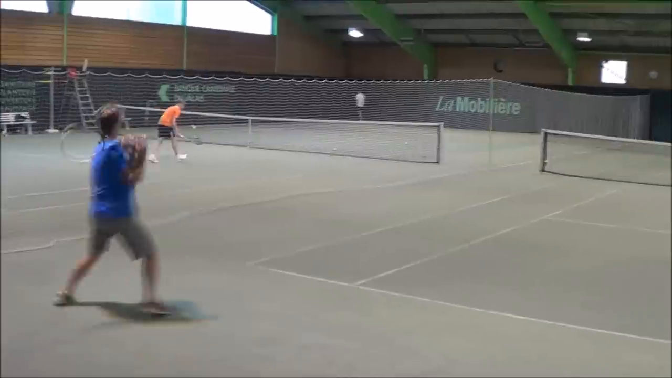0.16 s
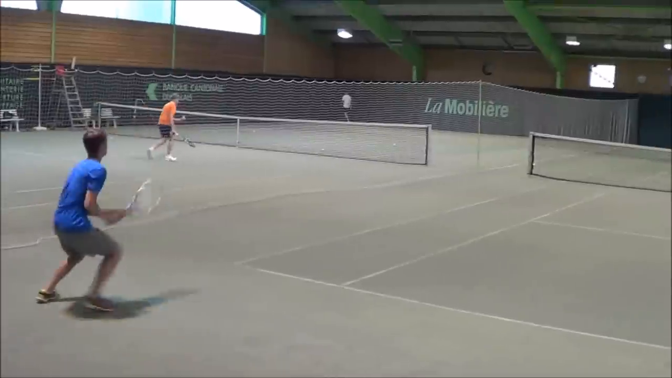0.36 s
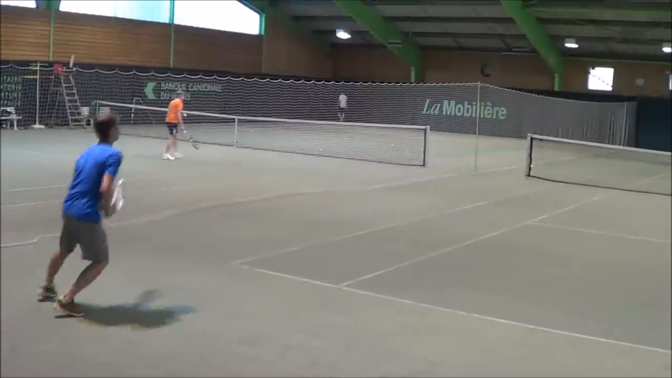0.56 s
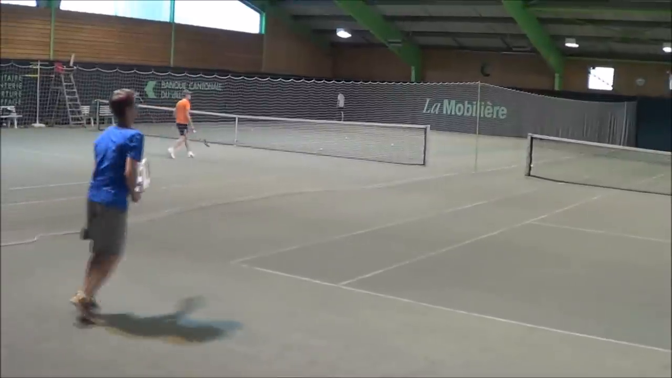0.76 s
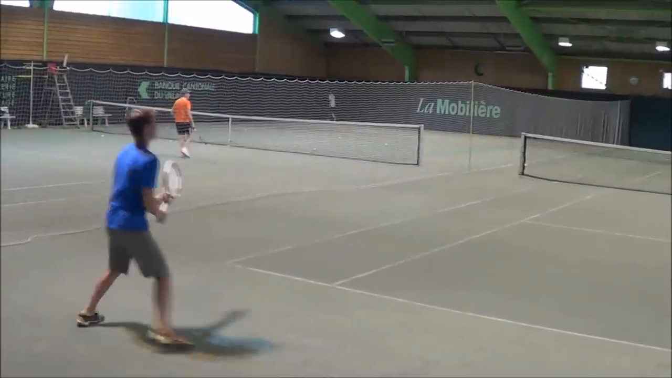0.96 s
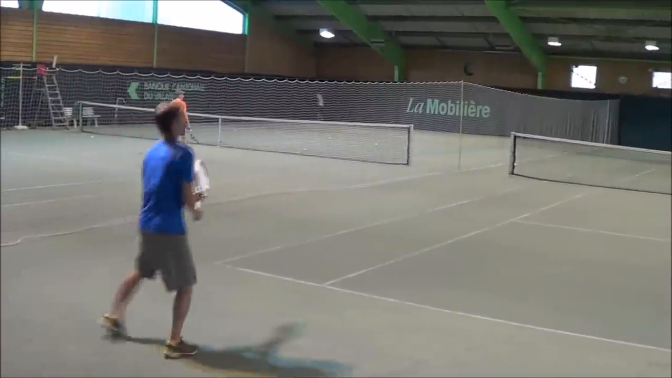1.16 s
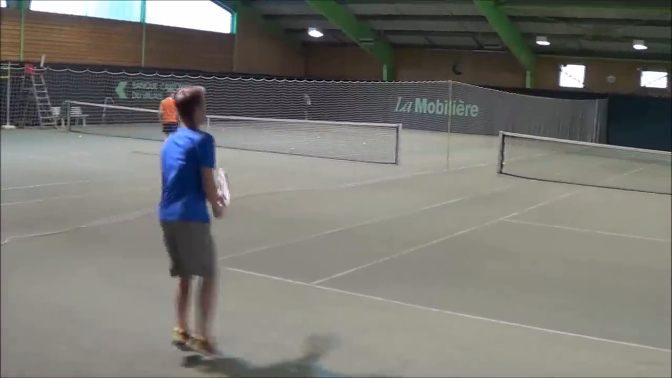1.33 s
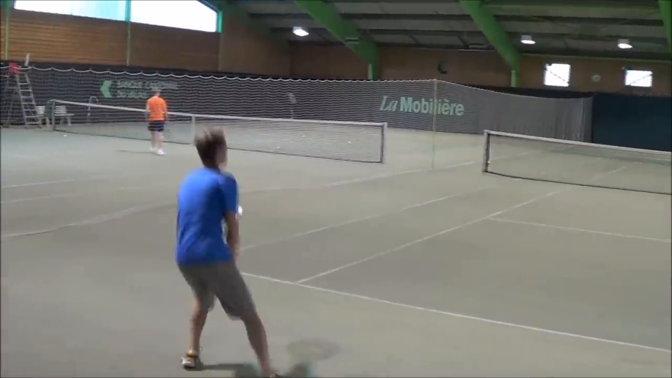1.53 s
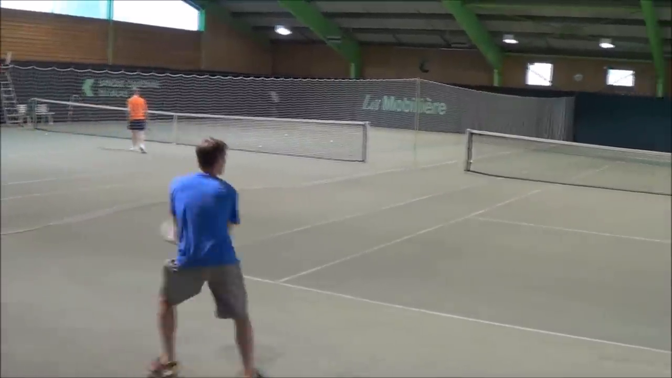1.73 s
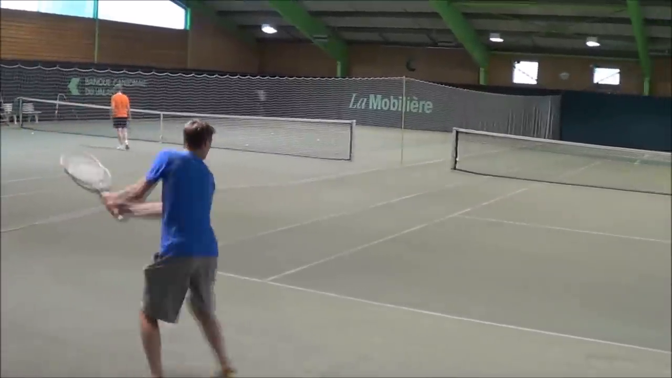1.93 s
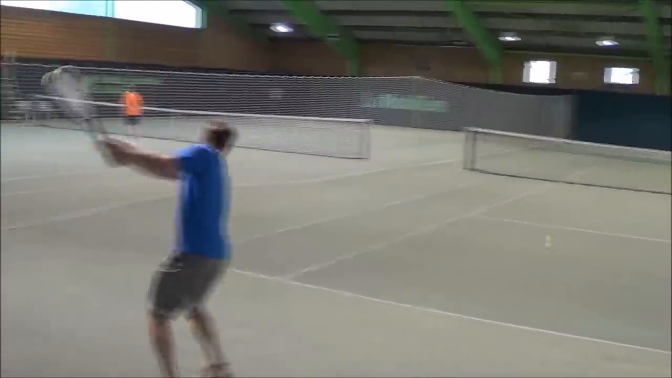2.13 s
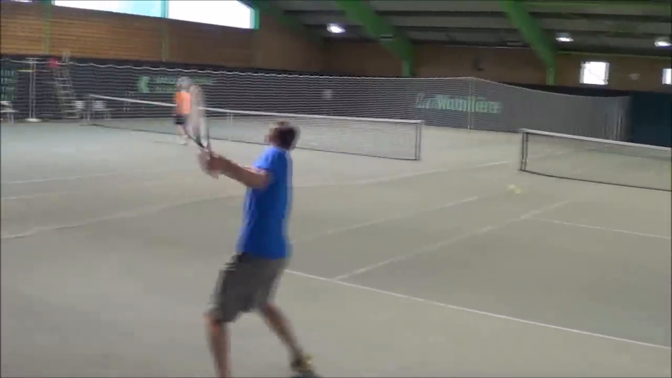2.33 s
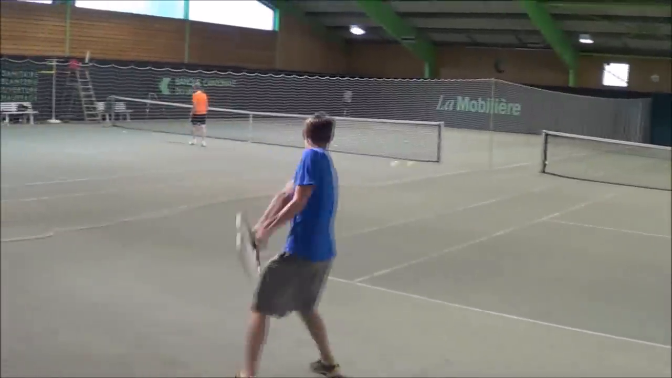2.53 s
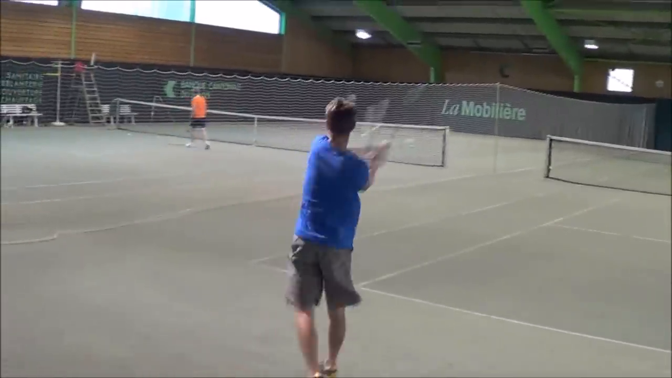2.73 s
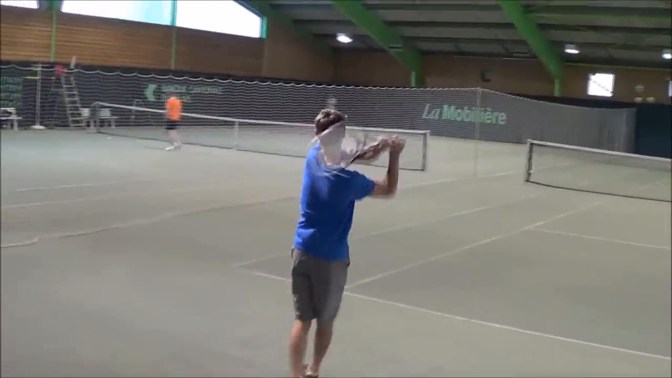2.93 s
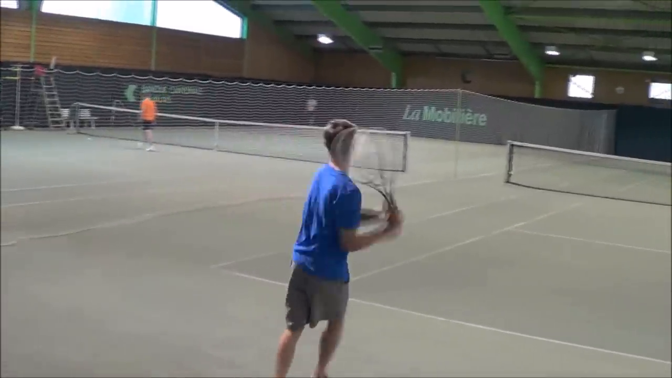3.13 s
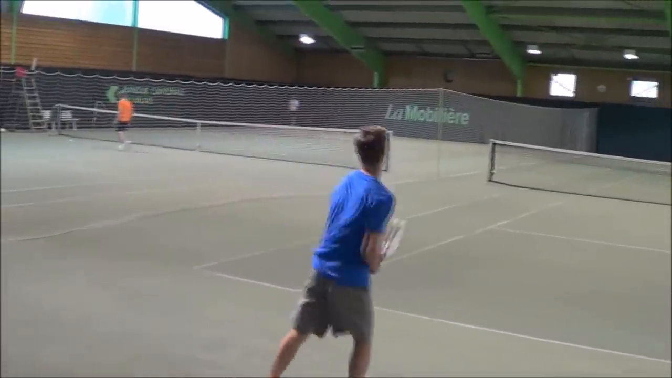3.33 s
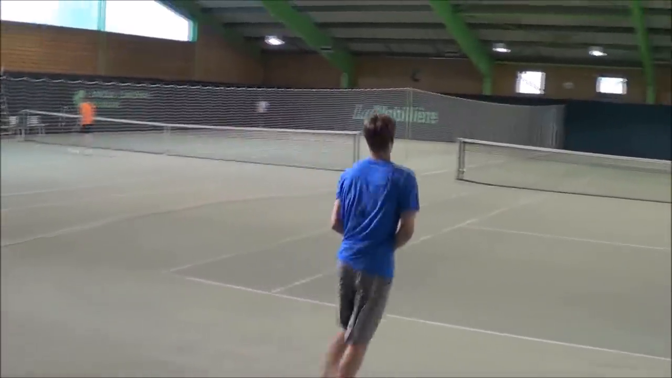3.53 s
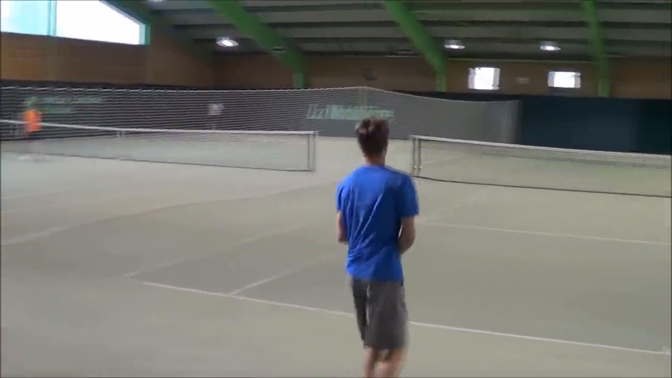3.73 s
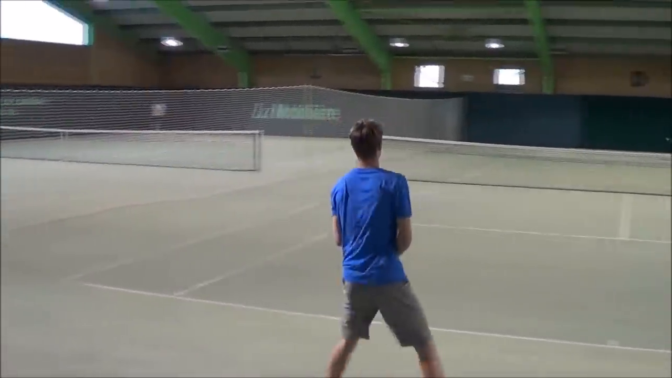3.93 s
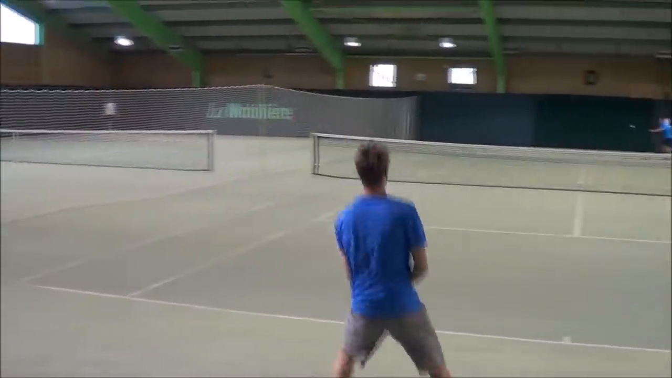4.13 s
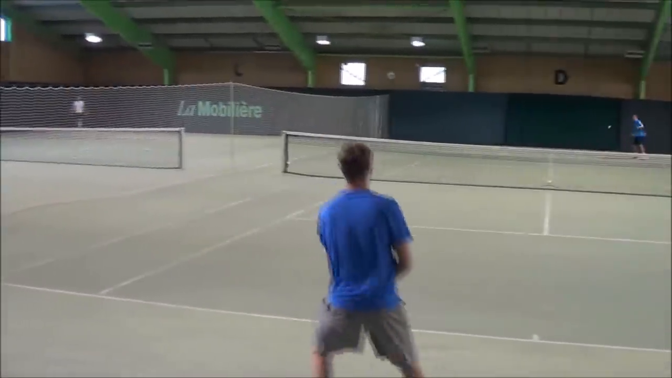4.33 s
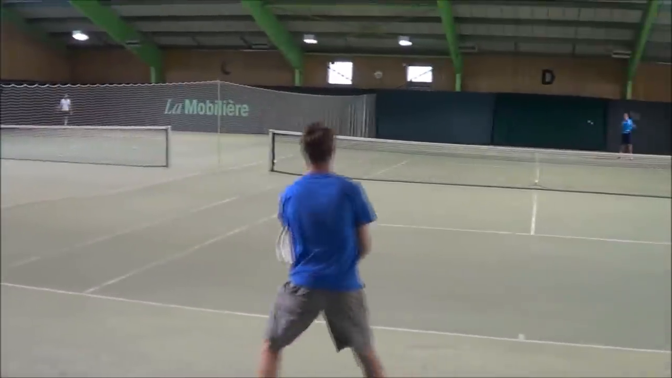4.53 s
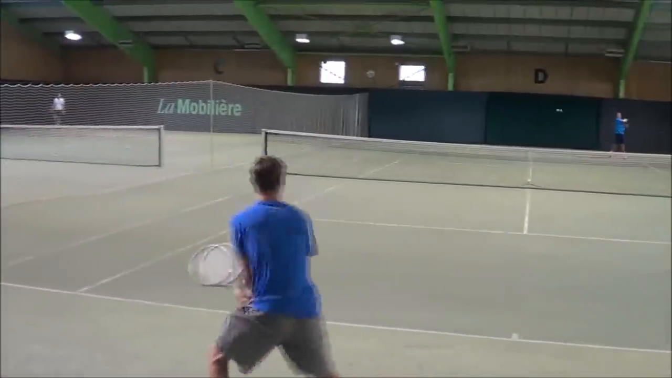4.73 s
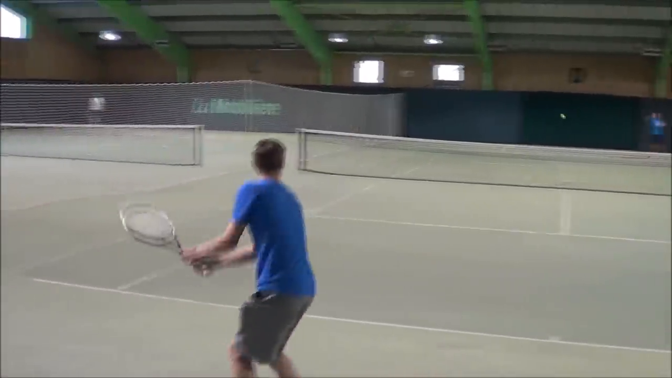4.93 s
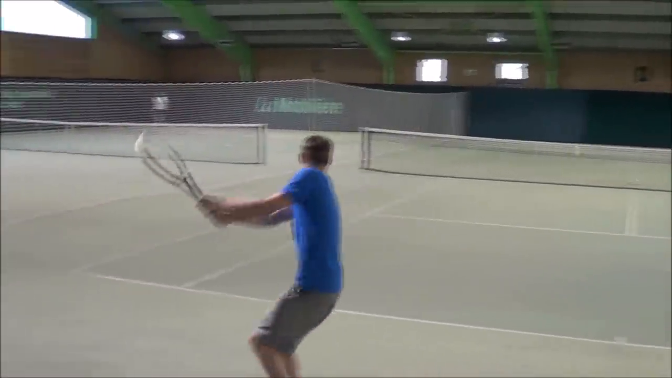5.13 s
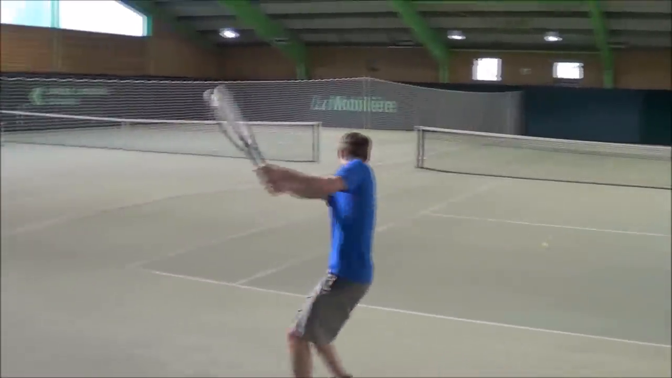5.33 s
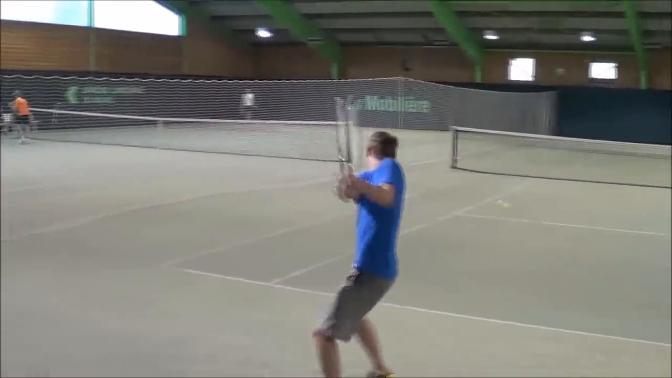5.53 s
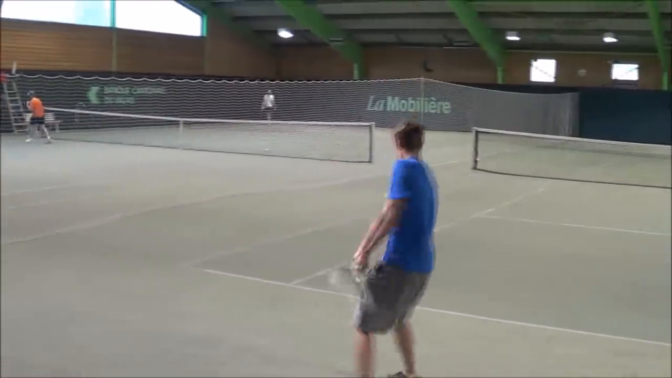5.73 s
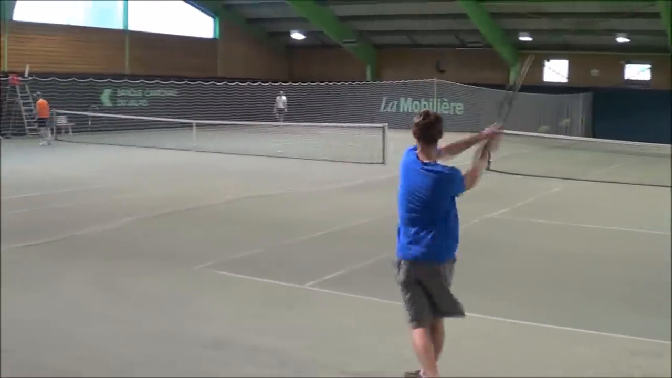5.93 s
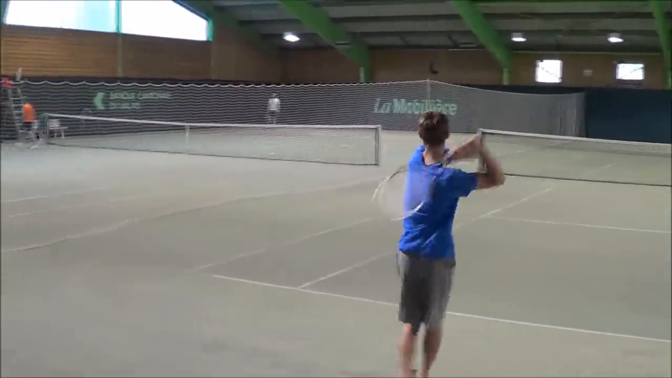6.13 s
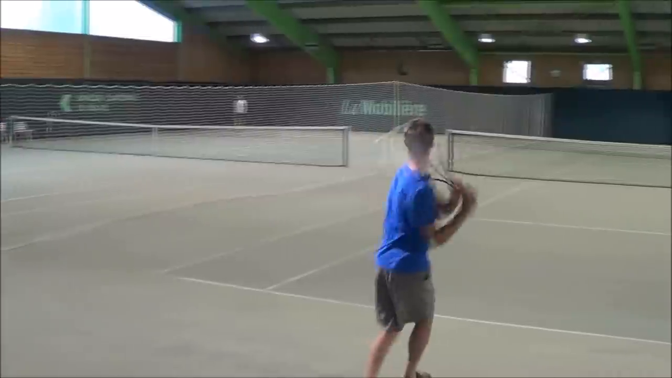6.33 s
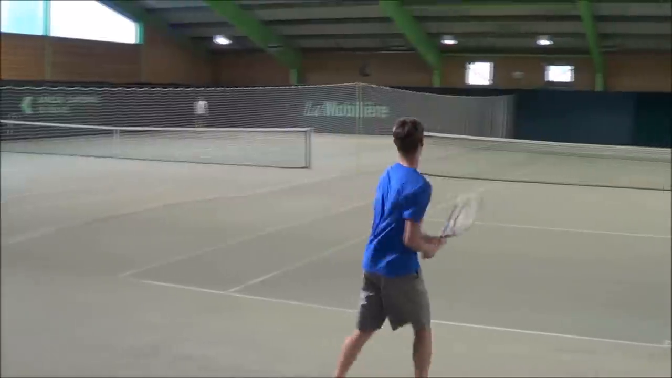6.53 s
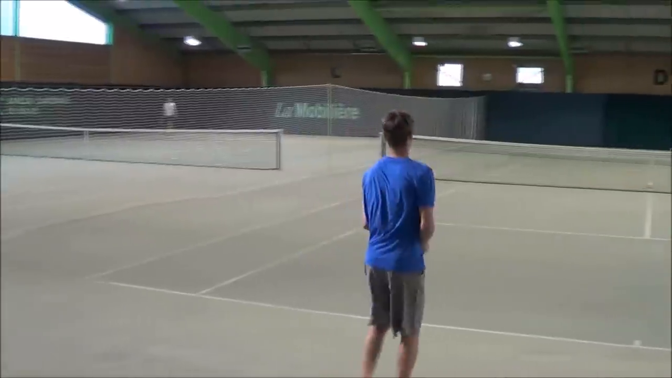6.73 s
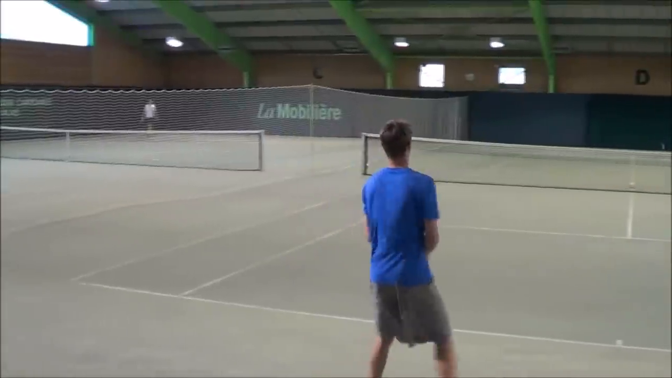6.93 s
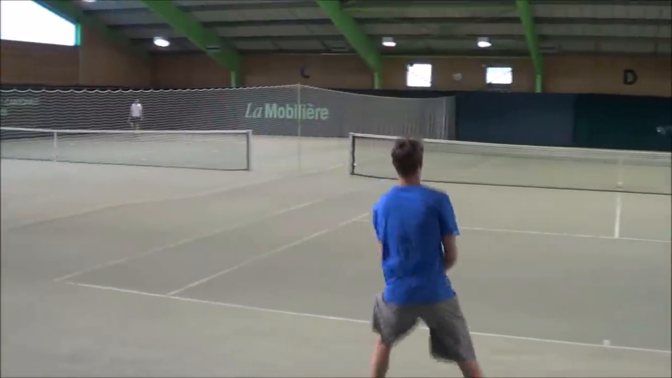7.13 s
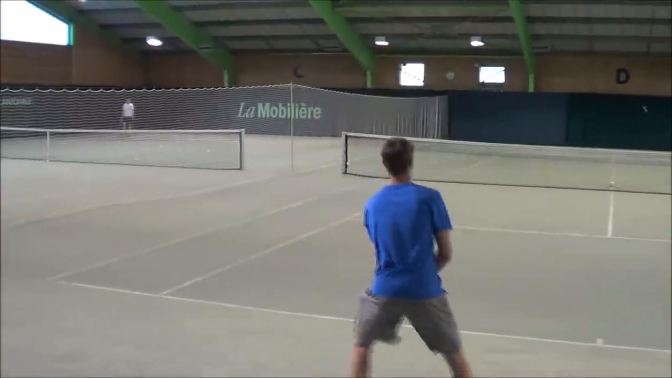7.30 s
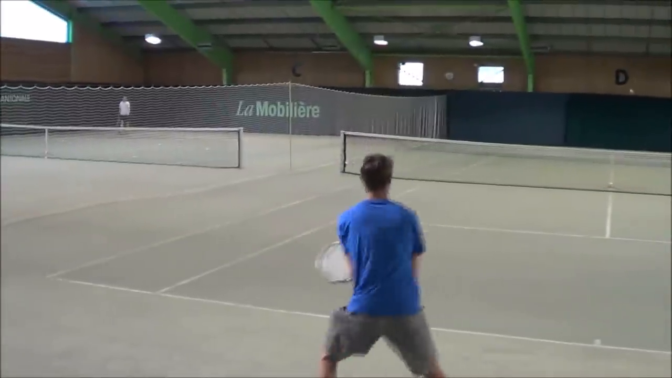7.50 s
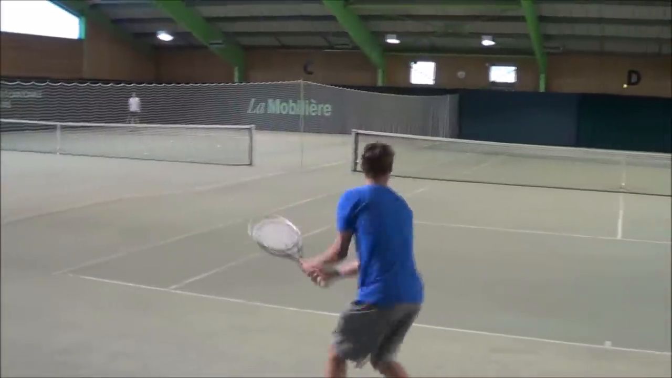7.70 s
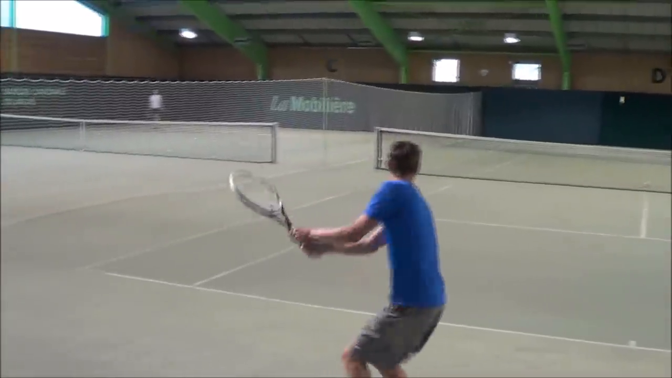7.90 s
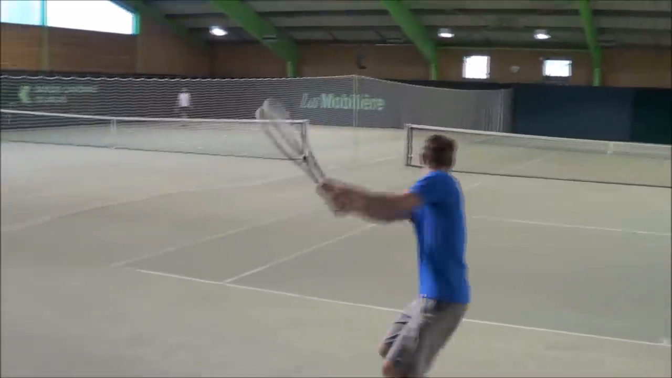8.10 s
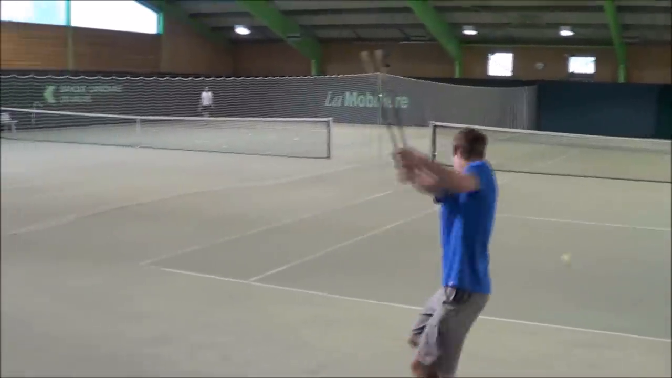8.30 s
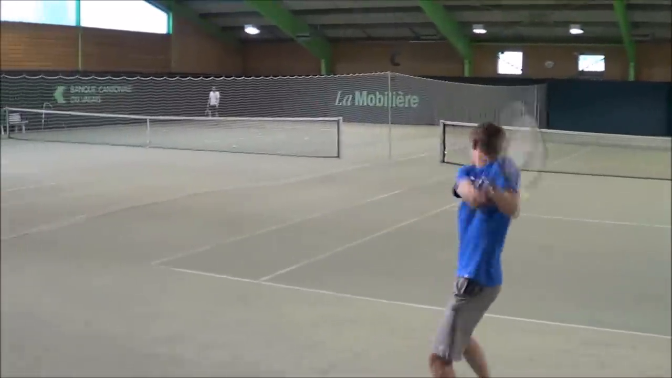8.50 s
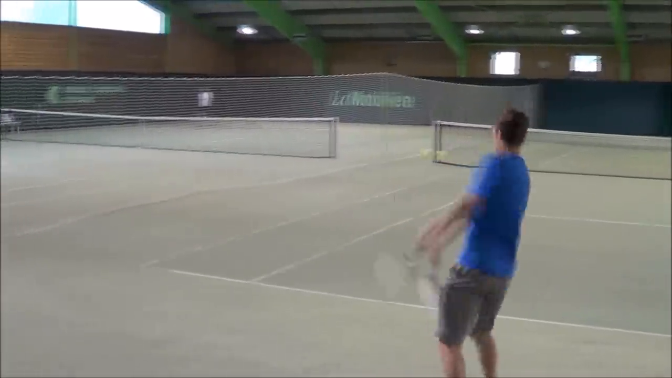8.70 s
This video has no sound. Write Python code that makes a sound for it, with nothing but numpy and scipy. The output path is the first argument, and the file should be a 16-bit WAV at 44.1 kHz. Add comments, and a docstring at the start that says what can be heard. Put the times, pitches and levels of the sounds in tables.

```python
"""A tennis rally in a large indoor hall, heard from a camcorder behind the near baseline.
Throughout, filtered noise makes the ventilation rumble and hiss, and a gated sine the camcorder's whine.
At the start a near stroke is already ringing; rolling noise grains scuff and drag soles over the gritty
court, and resonant pulses thump as footfalls. From about one second the ball bounces between strokes from
alternate ends: noise rasps, the struck body and ball ring, and a decaying noise hall answers for two seconds."""
import sys
import numpy as np
from scipy import signal
from scipy.fft import rfft, irfft
from scipy.io import wavfile
from scipy.ndimage import uniform_filter1d

SR = 44100
rng = np.random.default_rng(int(sys.argv[2]) if len(sys.argv) > 2 else 0)


def wav_record(signal):
    """Record a signal, one row per channel, as 16-bit PCM in the file named by sys.argv[1]."""
    frames = np.transpose(np.atleast_2d(signal))
    bounded = np.clip(frames, -1, 1)
    # unit amplitude maps onto the largest positive 16-bit level
    quanta = np.round(bounded * 32767).astype(np.int16)
    wavfile.write(sys.argv[1], SR, quanta)


N = 386316

# racket strokes, levels before the path to the microphones: t/s, player, strength/dB, ball ring over thud/dB,
# frame clack over thud/dB, ball ring f/Hz, left minus right/dB
STROKES = [ (-.05, "near", -18.5, 2.6, -9, 920, 1), (1.483, "far", -19.5, 3, -12, 950, -8.5),
           (2.877, "near", -18.5, -0.5, -15.5, 927, 0.5), (4.714, "far", -19.5, 3.5, -4.5, 935, -2.5),
           (6.017, "near", -18, 0, -7, 895, -.5), (7.419, "far", -19, -6.5, -11.5, 960, -5.5)]
# crack of felt on strings, also the edge of every other blow: f/Hz, relative level/dB
CRACK_SPECTRUM = [(700, -12), (2000, -6.5), (3100, -3), (4300, -3.5), (5600, -9.5), (8000, -9),
                  (10500, -12), (13000, -25), (16000, -34)]
# direct sound of 0 dB carries the energy of 10 ms of noise at rms 1
DIRECT_UNIT = np.sqrt(SR / 100)


def undb(db):
    """Decibels to gain."""
    return 10 ** (np.asarray(db) / 20)


def along(points, hz):
    """Read (Hz, value) points on a log-frequency axis."""
    f, value = np.transpose(points)
    return np.interp(np.log(np.maximum(hz, 1)), np.log(f), value)


def bins(size):
    """Frequencies of a spectrum of this many samples."""
    return np.fft.rfftfreq(size, 1 / SR)


def add(out, s, sound):
    """Mix a sound in from time s on, keeping only what falls inside the scene."""
    i = int(round(s * SR))
    a, b = max(i, 0), min(i + sound.shape[-1], N)
    if b > a:
        out[..., a:b] += sound[..., a - i:b - i]


def colour(x, points):
    """Give noise a spectrum, at rms 1."""
    gain = undb(along(points, bins(x.shape[-1])))
    y = irfft(rfft(x) * gain, x.shape[-1])
    return y / y.std()


def unit_energy(x):
    """Scale a short sound to energy 1."""
    return x / np.sqrt(np.sum(x ** 2))


def diffuse(seconds, fade=None, size=512):
    """Stereo noise arriving from all sides; fade(hz, t) is its gain over frequency and time."""
    # likeness of the diffuse sound at the two microphones: f/Hz, likeness/0-1
    likeness = [(60, .78), (130, .86), (300, .97), (900, .92), (2500, .76), (7000, .65), (12000, .98)]
    hz = bins(size)[:, None]
    t = np.arange(int(2 * seconds * SR / size) + 2) * size / 2 / SR
    shape = (2, len(hz), len(t))
    mid, side = rng.standard_normal(shape) + 1j * rng.standard_normal(shape)
    like = np.clip(along(likeness, hz), 0, 1)
    common, opposed = mid * np.sqrt(1 + like), side * np.sqrt(1 - like)
    pair = np.array([common + opposed, common - opposed])
    if fade:
        pair = pair * fade(hz, t)
    return signal.istft(pair)[1] / np.sqrt(2 * size)


def hall(late_db, pan_db=0, direct=0, seconds=2.4, build_s=0.0018, cluster_db=1.9, cluster_s=0.28):
    """Response from one place on the court: direct sound, single echoes, a quick early wash and the long tail."""
    # reverberation of the hall: f/Hz, time to fall 60 dB/s
    hall_t60 = [(100, 1.6), (300, 2.74), (600, 2.53), (950, 1.94), (1500, 1.31), (3000, 1.24), (6000, 1.19),
                (12000, 0.48)]
    # single echoes from court and roof, half the late level still to be added: delay/s, level/dB
    echoes = [(0.012, -12), (0.021, -3), (.032, -8), (0.054, -10)]
    early_t60_s = 0.27
    ears = undb(np.array([pan_db, -pan_db]) / 2)

    def fade(hz, t):
        # the early wash still comes from the side of the source, the tail from everywhere
        early = ears[:, None, None] * undb(-60 * t / early_t60_s)
        late = undb(late_db - 60 * t / along(hall_t60, hz))
        return np.hypot(early, late)

    response = diffuse(seconds, fade)
    t = np.arange(response.shape[1]) / SR
    response *= 1 - np.exp(-t / build_s)
    # the first reflections arrive in clusters, which even out as they multiply
    clusters = uniform_filter1d(rng.standard_normal(len(t)), size=260)
    depth_db = cluster_db * np.exp(-t / cluster_s)
    response *= undb(depth_db * np.clip(clusters / clusters.std(), -2, 2))
    response[:, 0] += DIRECT_UNIT * direct * ears
    for delay, db in echoes:
        i = int(delay * SR * rng.uniform(.96, 1.04))
        response[:, i] += DIRECT_UNIT * undb(db + late_db / 2) * ears
    return response


def resonance(hz, centre_hz, width_hz):
    """Gain of a resonance with steep skirts."""
    hz = np.maximum(hz, 1)
    return 1 / (1 + ((hz ** 2 - centre_hz ** 2) / (hz * width_hz)) ** 2)


def blow(modes, crack_db, size=4096):
    """The short causal pulse of a contact: resonances (Hz, width Hz, dB) and a broad crack."""
    hz = bins(size)
    parts = [(resonance(hz, f, width), db) for f, width, db in modes]
    parts.append((undb(along(CRACK_SPECTRUM, hz)), crack_db))
    power = sum(undb(db) ** 2 * gain ** 2 / np.mean(gain ** 2) for gain, db in parts)
    # folding the cepstrum gives minimum phase: the energy comes as early as it can
    cepstrum = irfft(np.log(power) / 2)
    cepstrum[1:size // 2] *= 2
    cepstrum[size // 2 + 1:] = 0
    return irfft(np.exp(rfft(cepstrum)))


def ball_ring(t, ring_hz, contact_s):
    """The hollow pock of the ball: it swells as the ball springs back and is gone in a few cycles more."""
    # the ball's modes: ratio to the ring pitch, relative level/dB, swell time before the contact's share/s
    modes = [(.78, -8.5, 0.00082), (0.998, 1, .0012)]
    swell_per_contact = 0.26  # a longer contact makes the ball spring back later (s per s)
    ring = 0
    for ratio, db, spring_s in modes:
        swell_s = spring_s + swell_per_contact * contact_s
        swell = unit_energy((t / swell_s) ** 2 * np.exp(-2 * t / swell_s))
        ring = ring + undb(db) * swell * np.sin(2 * np.pi * ratio * ring_hz * (t - swell_s))
    return unit_energy(ring)


def ball_hit(s, body, body_db, ring_db, ring_hz, crack_db, contact_s, direct_db, late_db, pan_db, slaps,
             snap_db, squash_s):
    """Felt rasps during contact; as the ball squashes, the struck body and the ball ring into the hall."""
    out, t = np.zeros((2, N)), np.arange(4096) / SR
    modes = [(f, width, db) for (f, width), db in zip(body, body_db)]
    ring = undb(ring_db) * ball_ring(t, ring_hz, contact_s)
    contact = np.sqrt(t / contact_s) * np.exp(-t / contact_s)
    felt = colour(rng.standard_normal(len(t)), CRACK_SPECTRUM)
    rasp = undb(crack_db + snap_db) * unit_energy(felt * contact)
    # straight to the microphones: the rasp first, the knock just behind it
    direct = DIRECT_UNIT * undb(direct_db + np.array([[pan_db], [-pan_db]]) / 2)
    add(out, s, direct * rasp)
    add(out, s + squash_s, direct * (blow(modes, crack_db - 24) + ring))
    # hard walls return the rasp as separate slaps
    for slap_s, slap_db in slaps:
        add(out, s + slap_s, DIRECT_UNIT * undb(slap_db) * rasp)
    # body and ball radiate in different directions, so each finds its own paths through the hall
    for pulse in (blow(modes, crack_db), ring):
        add(out, s + squash_s, signal.fftconvolve(hall(late_db, pan_db), pulse[None], axes=1))
    return out


def background():
    """Ventilation rumble of the hall as diffuse noise, with the hiss and thin whine of the camcorder."""
    # steady background: f/Hz, relative density/dB per Hz
    floor = [(25, -16), (52, 0), (80, -4.5), (130, -7.5), (210, -7), (320, -1.5), (500, -15), (1000, -14.5),
             (2000, -23), (4500, -30), (9000, -31), (14000, -36.5)]
    floor_db, whine_db, whine_hz = -43.5, -62.5, 15625
    field_hz, whine_gap = 50, .25  # the whine breaks off for this share of each picture field
    air = colour(diffuse(N / SR)[:, :N], floor)
    t = np.arange(N) / SR
    running = uniform_filter1d(1. * (t * field_hz % 1 > whine_gap), size=100)
    whine = np.sqrt(2) * np.sin(2 * np.pi * whine_hz * t) * running
    return undb(floor_db) * air + undb(whine_db) * whine


def slides():
    """Every slide of a sole, as (s, length s, grind dB, hiss dB, rise): near and far, scuffed and dragged."""
    # the near player's scuffs, before the overall slide level: t/s, length/s, hiss level/dB
    near_scuffs = [ (0.137, 0.034, -42.5), (.293, 0.05, -41.5), (0.88, 0.058, -51), (1.16, 0.027, -47.5),
                   (1.979, 0.087, -51), (2.178, 0.057, -48.5), (2.737, .008, -48), (3.043, 0.077, -44),
                   (3.484, 0.022, -50.5), (3.859, 0.021, -47), (3.948, 0.038, -51.5), (4.28, .15, -49),
                   (5.031, 0.032, -44.5), (5.215, 0.043, -42.5), (5.398, 0.11, -48.5), (6.164, 0.18, -43.5),
                   (7.301, 0.069, -47), (7.797, .044, -46), (7.928, 0.056, -45)]
    # the far player's slides, before the overall slide level: t/s, length/s, grind level/dB
    far_slides = [(0.365, 0.21, -37), (1.038, 0.13, -45), (1.341, 0.097, -50), (1.698, 0.52, -37),
                  (2.526, 0.24, -49), (3.53, 0.26, -43.5), (3.981, 0.15, -45), (4.62, 0.4, -42),
                  (7.107, 0.12, -49.5)]
    far_hiss_db = -21.5  # over the grind: distance dulls the slide
    # an ordinary scuff; a sole pressed harder grinds more (dB per dB)
    scuff_db, grind_db, grind_per_hiss = -47, -38.5, 1.63
    # how slowly a slide builds up (exponent): a scuff bites at once, a dragged foot swells
    scuff_rise, drag_rise = 0.45, 1.02
    # the near player's rear foot drags through every stroke
    drag_lead_s, drag_s, drag_grind_db, drag_hiss_db = .135, 0.22, -39, -44
    # light shuffling, one at a random moment of each time slot
    shuffles_per_s, shuffle_s, shuffle_db = 1.3, 0.018, -58
    shuffle_times = (np.arange(20) + rng.random(20)) / shuffles_per_s
    shuffles = [(s, shuffle_s, shuffle_db) for s in shuffle_times]
    near = [(s, length, grind_db + grind_per_hiss * (db - scuff_db), db, scuff_rise)
            for s, length, db in near_scuffs + shuffles]
    drags = [(s - drag_lead_s, drag_s, drag_grind_db, drag_hiss_db, drag_rise)
             for s, player, *_ in STROKES if player == "near"]
    far = [(s, length, db, db + far_hiss_db, scuff_rise) for s, length, db in far_slides]
    return near + drags + far


def scuffs(grain_db=3, catch_db=3, fall=0.75, near_db=8, level_db=3):
    """A sliding sole rolls loose grit: dense uneven ticks that swell and die with the slide."""
    # the low voice of a sliding sole: f/Hz, relative level/dB
    grind = [(150, -7), (500, 3), (1150, 4.5), (1500, -1.5), (2200, -4), (3200, -18), (5000, -23),
             (12000, -62)]
    # its high voice: f/Hz, relative level/dB
    hiss = [(1000, -57), (2500, 6.5), (4000, 3), (6000, 0), (9500, 0), (12000, -11), (16000, -16)]
    push = np.zeros((2, N))  # rows: grind, hiss
    for s, length, grind_db, hiss_db, rise in slides():
        u = np.linspace(0, 1, int(length * SR))
        swell = u ** abs(rise) * (1 - u) ** abs(fall)
        add(push, s, undb([[grind_db], [hiss_db]]) * swell / swell.max())
    # the sole catches and lets go every few ms
    catch = uniform_filter1d(rng.standard_normal(N), size=180)
    push *= undb(catch_db * np.tanh(catch / catch.std()))
    grit = rng.standard_normal((2, N))
    grit = grit * undb(grain_db * np.minimum(rng.exponential(size=(2, N)), 2))
    sound = push[0] * colour(grit[0], grind) + push[1] * colour(grit[1], hiss)
    room = hall(late_db=-7.5, direct=undb(near_db))
    room = room / np.sqrt(np.sum(room ** 2) / 2)
    return signal.fftconvolve(room, sound[None], axes=1)[:, :N] * undb(level_db)


def strokes():
    """The players hit in turn; strength sets the crack, the end of the court sets how the hall answers."""
    # what a stroke rings with, rows thud, strings and frame: f/Hz, width/Hz
    racket = [(335, 344), (570, 550), (1580, 920)]
    # the two ends of the court: direct level/dB, late hall level/dB, contact time/s,
    # slaps from walls and roof as (delay/s, level/dB)
    ends = {"near": (-2.7, -1.18, 0.0032, [(.020, -13), (.120, -16.5)]),
            "far": (-8, -0.87, 0.0026, [(.0105, -10.5), (.030, -10), (.083, -23)])}
    # an ordinary stroke: level of its thud, and of strings and crack over the thud
    stroke_db, strings_db, stroke_crack_db = -18.5, -2.5, -12.5
    # dB per dB: harder strokes crack more; the more the ball rings, the less the strings do
    crack_per_strength, strings_per_ring = 2.7, -.45
    out = 0
    for s, player, db, ring_db, clack_db, ring_hz, pan_db in STROKES:
        direct_db, late_db, contact_s, slaps = ends[player]
        body_db = db, db + strings_db + strings_per_ring * ring_db, db + clack_db
        crack_db = db + stroke_crack_db + crack_per_strength * (db - stroke_db)
        out = out + ball_hit(s, racket, body_db, db + ring_db, ring_hz, crack_db, contact_s,
                             direct_db, late_db, pan_db, slaps, snap_db=11.5, squash_s=.0022)
    return out


def footfalls(thump_hz=235, width_hz=170, direct_db=1, late_db=-14):
    """Soft soles thump the court: one low resonance with hardly any crack, mostly direct sound."""
    # heavy footfalls, before the thump's own level and the hall: t/s, level/dB
    steps = [(.179, -24), (.439, -23.5), (1.059, -34.5), (1.203, -36), (1.981, -25.5), (2.655, -31.5),
             (5.169, -29), (7.25, -33.5), (7.926, -31.5)]
    hits = np.zeros(N)
    for s, db in steps:
        add(hits, s, undb(db) * blow([(thump_hz, width_hz, -3)], -29))
    room = hall(late_db, direct=undb(direct_db))
    return signal.fftconvolve(room, hits[None], axes=1)[:, :N]


def bounces():
    """The ball meets the court: a dry thump nearby, dull and mostly hall from far away."""
    # ball bounces, levels before the path to the microphones: t/s, thump level/dB, shell over thump/dB,
    # ball ring over thump/dB, ball ring f/Hz, distance/m, contact time/s
    landings = [ (1.159, -47.5, -10, 4, 1018, 5.5, 0.0023), (2.339, -32.5, 0.5, -1, 1050, 8.3, 0.0027),
                (4.197, -38, 2.5, 3, 1126, 20.5, 0.0028), (5.379, -26, -4, 5.5, 929, 7.5, 0.0073),
                (5.557, -32, 0.5, 3.5, 950, 7.4, 0.0015), (7.090, -44.5, -5.5, -0.5, 1040, 25, 0.0027),
                (8.506, -31, -14, -10.5, 1090, 4.8, .0005)]
    # what a bounce rings with, rows thump, shell and slap: f/Hz, width/Hz
    court = [(232, 180), (480, 1340), (1900, 680)]
    # the court's near walls return each bounce: delay/s, level/dB
    wall_slaps = [(.011, -8), (.021, -17)]
    # direct sound is 0 dB at this distance; farther away the long tail takes over
    balance_m, bounce_late_db, late_db_per_doubling = 8.56, -6, 6.5
    # slap and crack over the thump; both fade with distance
    court_slap_db, bounce_crack_db, duller_db_per_doubling = -12, -22.5, 5.5
    out = 0
    for s, db, shell_db, ring_db, ring_hz, metres, contact_s in landings:
        doublings = np.log2(metres / balance_m)
        direct_db = 20 * np.log10(balance_m / metres)
        late_db = bounce_late_db + late_db_per_doubling * doublings
        treble_db = db - duller_db_per_doubling * doublings
        body_db = db, db + shell_db, treble_db + court_slap_db
        out = out + ball_hit(s, court, body_db, db + ring_db, ring_hz, treble_db + bounce_crack_db,
                             contact_s, direct_db, late_db, pan_db=0.5, slaps=wall_slaps,
                             snap_db=4.5, squash_s=0.001588)
    return out


def scene():
    """Background, footwork, strokes and bounces in the hall."""
    return strokes() + bounces() + footfalls() + scuffs() + background()


def record(dry, ceiling=0.87):
    """The close microphone pair shifts phase and level between channels; peaks are rounded, the top is cut."""
    # phase by which the right microphone leads: f/Hz, phase/rad
    lead = [(40, 0), (140, 0), (340, 0.81), (1000, 1), (2500, 0.64), (5000, 0.77), (12000, 0)]
    # left minus right sensitivity of the microphones: f/Hz, level/dB
    balance = [(60, 1), (250, -1), (1000, -1.1), (4400, -1.4), (8000, .4), (12000, 0)]
    top_hz = 15900
    hz, sides = bins(N), np.array([[1], [-1]]) / 2
    ports = np.exp(-1j * along(lead, hz) * sides) * undb(along(balance, hz) * sides)
    heard = irfft(rfft(dry) * ports, N)
    pair = ceiling * np.tanh(heard / ceiling)
    return signal.sosfilt(signal.ellip(10, .2, 70, top_hz, fs=SR, output="sos"), pair)


dry = scene()
out = record(dry)
wav_record(out)
```